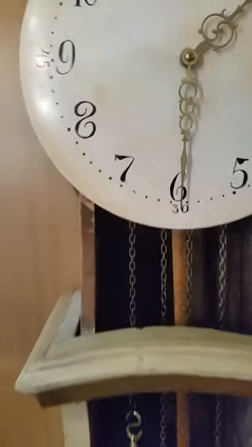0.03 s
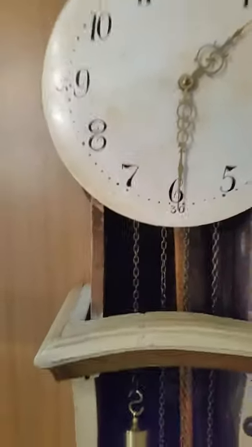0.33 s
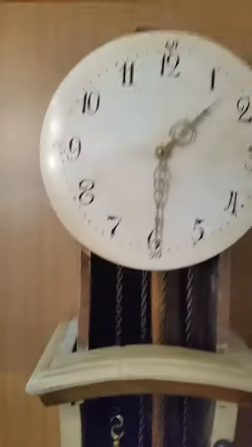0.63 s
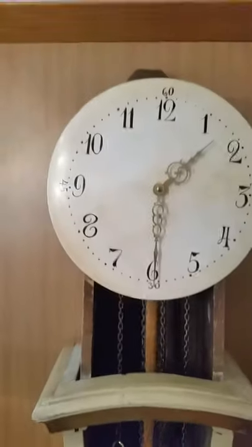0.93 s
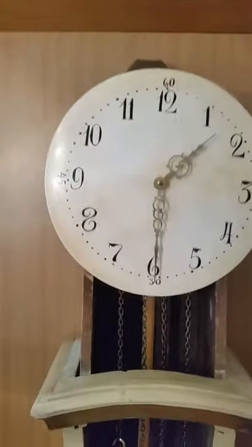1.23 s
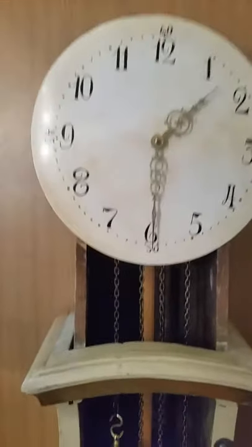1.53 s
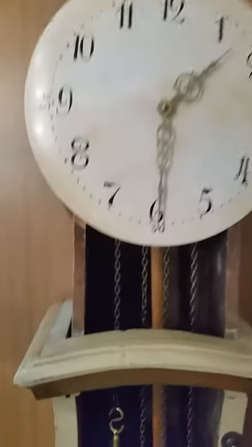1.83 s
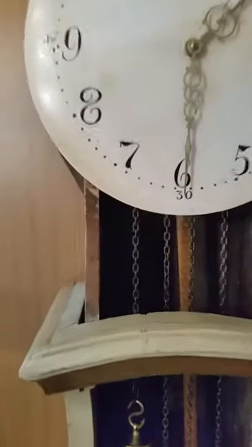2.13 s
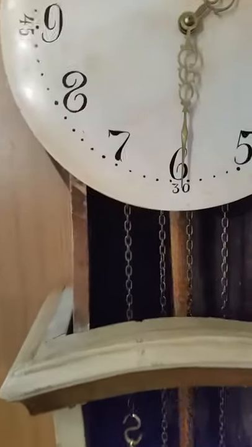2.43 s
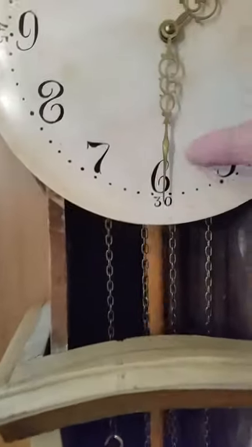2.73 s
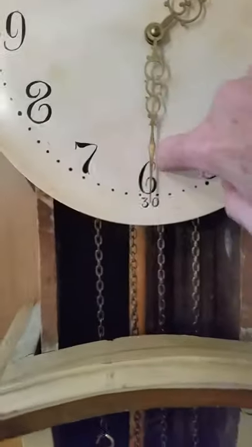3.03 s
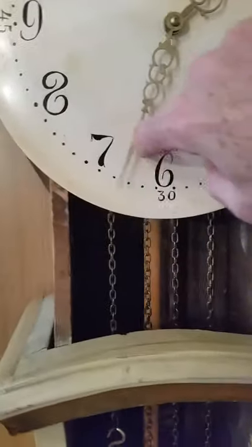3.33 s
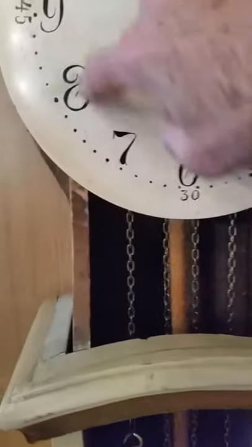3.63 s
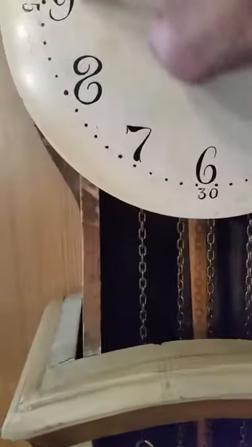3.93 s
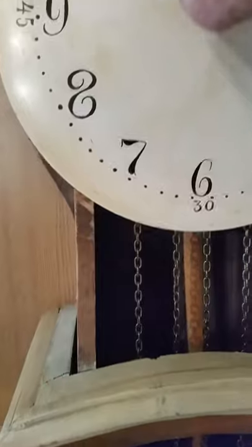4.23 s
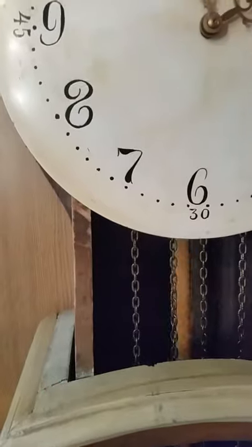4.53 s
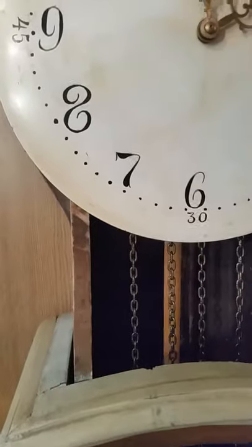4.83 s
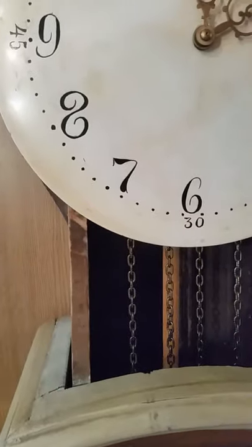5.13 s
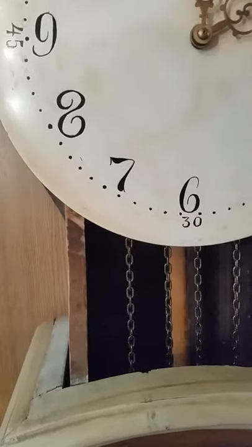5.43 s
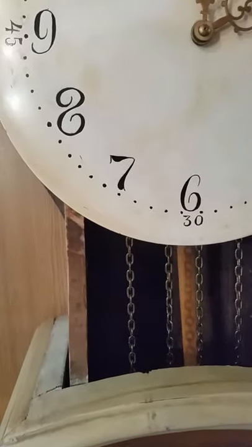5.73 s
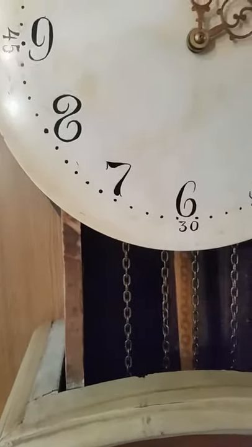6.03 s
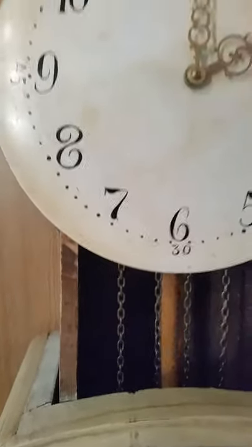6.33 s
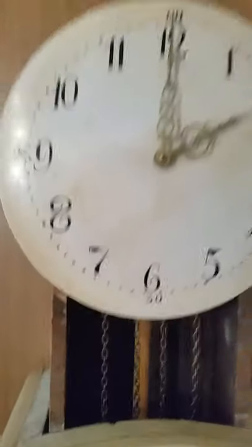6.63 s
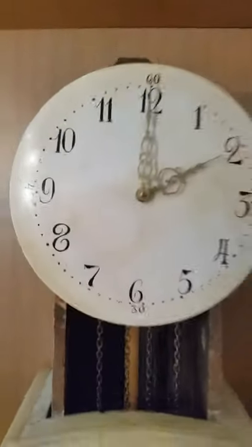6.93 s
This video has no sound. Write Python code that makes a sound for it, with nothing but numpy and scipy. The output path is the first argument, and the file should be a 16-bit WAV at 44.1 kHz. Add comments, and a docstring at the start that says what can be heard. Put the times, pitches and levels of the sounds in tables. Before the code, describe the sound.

A wall clock ticks faintly and evenly, about every 0.6 seconds, in a quiet room with soft hiss and the constant low rumble of a hand-held microphone. At 0.3 seconds a lever clicks and a small bell buzzes brightly against its hammer, choked after about half a second. At 1.1 seconds a larger bell is struck once, with a click and a soft knock from the wooden case. A quick run of dull handling bumps follows at 1.2 seconds. The bell's high, clear ring holds for about a second and then falls away, leaving a faint, gently wavering tone that lingers to the end. Light microphone bumps come here and there, one near 4 seconds. The case knocks softly at 5 seconds, and again with a lever click at 5.5. At about 6.9 seconds another click starts the small bell buzzing again, slightly duller, right at the end.

```python
"""A low rumble and a soft hiss fill a quiet room, where a wall clock ticks as a finger turns its minute hand.
A small bell buzzes against its hammer and is choked; a larger bell, struck once, rings on in its
slowly damped modes; then the small one starts again. Levers click and the wooden case knocks.
The hand-held microphone rumbles and bumps, and drifts through the standing waves of the long partials."""
import sys
import numpy as np
from scipy import signal
from scipy.fft import rfft, irfft, next_fast_len
from scipy.io import wavfile
from scipy.ndimage import map_coordinates

SR = 44100
rng = np.random.default_rng(int(sys.argv[2]) if len(sys.argv) > 2 else 0)


def to_wav(sig):
    """Store sig (one row per channel, or 1-D mono) as 16-bit WAV at the path in sys.argv[1].

    Samples outside -1..1 are clipped; the rate is SR.
    """
    pcm = np.clip(np.atleast_2d(sig), -1, 1) * 32767
    pcm = np.round(pcm).astype(np.int16)
    wavfile.write(sys.argv[1], SR, pcm.T)  # frames by channels


N = 308700
TIME = np.arange(N) / SR

# Spectra give shape only. A balance is left minus right; a lead is the left port's phase advance.
# rumble of the hand, room hiss and its bright top: frequency_hz, level_db
RUMBLE_SPECTRUM = [(15, -7), (30, 5.5), (55, 2), (105, -2.5), (160, -12), (220, -16.5), (310, -27),
                   (420, -34), (800, -49), (2000, -84.5)]
HISS_SPECTRUM = [(300, 0), (700, -2), (1100, -4), (1550, -6.5), (1950, -16.5), (2500, -9), (2950, -18.5),
                 (3350, -14), (3900, -3.5), (4500, -3), (5000, -12.5), (5800, -34.5), (8000, -44.5),
                 (10000, -32)]
AIR_SPECTRUM = [(8000, -62.5), (10000, -23.5), (12000, -11.5), (13700, -1.5), (15700, -4.5)]
# their lean between the microphone ports: frequency_hz, balance_db
RUMBLE_LEAN = [(30, 1.5), (70, 6), (160, 15.5), (350, 7.5)]
HISS_LEAN = [(400, 3.5), (1300, 6), (1950, 4), (2500, 7.5), (2950, 0), (4200, 17.5), (6000, -3.5),
             (14000, 4.5)]
# rumble, stronger while the hand moves: time_s, relative_db
RUMBLE_CONTOUR = [(0.0, -38.5), (0.41, -36.5), (0.66, -35), (0.99, -40), (2.05, -36), (3.92, -41),
                  (4.31, -41), (4.54, -41), (5.87, -42.5), (6.1, -38), (7.0, -38)]

# tock and tick: treble_db, case_db
TOCK_TICK = [(-66, -55), (-51, -52)]
# a click and the wooden case's response: frequency_hz, level_db
CLICK_SPECTRUM = [(1000, -15), (2900, -14), (4200, -3.5), (5500, -34), (8000, -38), (10000, -20),
                  (14000, 2), (15800, 5)]
CASE_SPECTRUM = [(150, -8.5), (500, 11), (1300, -5), (1900, -11.5), (2500, -13), (3200, -13), (6000, -54.5)]

# bumps of the hand on the microphone: start_s, relative_db, pitch_hz
HAND_BUMPS = [(.259, -18, 83), (1.228, -9, 96), (2.885, -22.5, 88.5), (4.065, -18.5, 98.5),
              (4.745, -27, 74), (5.224, -26.5, 221), (5.256, -19.5, 129), (5.579, -26.5, 98),
              (6.795, -22, 82.5)]
# skin rubbing the housing: frequency_hz, level_db
SKIN_SPECTRUM = [(60, -7.5), (230, 4.5), (330, -6), (450, -20.5), (700, -40.5), (2000, -74)]

# blows on the small bell: start_s, gain_db, tilt_db_per_octave, buzz_db, extra_rise_s
SMALL_BLOWS = [(.321, 0, 0, -36.5, 0), (6.867, 1.5, -4.5, -38, 0.019)]
# its modes: pitch_hz, level_db, rise_s, hold_s, t60_s, balance_db, roughness_ratio, beat_hz
SMALL_MODES = [(461, -64, .02, .25, .8, 10, .8, 20), (1140, -64, .02, .22, .9, 12, .8, 25),
               (1753, -60.5, .025, .22, .75, 5, .3, 13), (4141, -46, .001, .21, .45, -1, .2, 7),
               (4076, -57, .15, .45, 1.5, 8, .15, 2), (6989, -51.5, .08, .2, .45, -3, .25, 4),
               (7159, -62, .02, .38, .8, -3, .4, 3), (10545, -43.5, .04, .17, .42, 21, .15, 6),
               (10593, -50, .07, .22, .6, 14, .25, 3), (14672, -32.5, .001, .12, .7, 21, .55, 22),
               (14698, -44, .002, .31, .75, 21, .3, 48), (15680, -49, .002, .13, .85, 21, .9, 27),
               (12640, -58, .003, .18, .9, 17, 1, 30)]
# its hammer's buzz: frequency_hz, level_db
BUZZ_SPECTRUM = [(300, -12), (2900, -37), (4200, -7.5), (5500, -60), (9500, -98), (10400, -12),
                 (11400, -27.5), (12500, -9), (13300, -27), (14000, -14.5), (14600, 5), (15100, -19.5),
                 (15700, 2.5)]

# impacts of hammers and levers: start_s, treble_db, t60_s, case_db
LEVER_CLICKS = [(.321, -40, 0.033, -56), (0.368, -51, 0.019, -66), (1.065, -39.5, 0.17, -64),
                (5.521, -54, .12, -53.5), (6.869, -36, .02, -59)]
# soft knocks of the works and case: start_s, level_db, pitch_hz, width_hz, t60_s
WOOD_KNOCKS = [(1.03, -55, 583, 90.5, 0.57), (5.014, -50, 1400, 300, 0.064), (5.02, -53.5, 650, 150, 0.16),
               (5.513, -56, 1220, 500, 0.25)]

# the blow on the large bell: start_s, gain_db
LARGE_BLOW = (1.066, 0)
# its upper modes: pitch_hz, level_db, rise_s, hold_s, t60_s, balance_db, roughness_ratio, beat_hz
UPPER_MODES = [(6412, -58.5, .003, .14, 2.5, -5, .15, 8), (9545, -58, .004, .2, .8, 5, .05, 3),
               (9611, -48.5, .004, .12, .8, 9, .05, 1.5), (13139, -39, .004, .055, .36, 23, .06, 3),
               (15660, -48, .001, .025, .35, 22, .35, 35)]
# the microphone's path through the hum tone's standing wave: time_s, gain_db, balance_db, lead_rad
MICROPHONE_DRIFT = [(1.2, -0.5, -5, -0.5), (1.72, -1, -2, -2.5), (2.35, 5.5, 6, -2), (3.0, 1, 11.5, -.8),
                    (3.7, 1.5, 19.5, 0), (4.5, 4.5, 18.5, -2), (6.2, -1.5, 13.5, -2), (6.8, -11.5, 5, -0.5)]
# the large bell's two main modes: lower_hz, upper_hz
PAIR_PITCHES = (3664.8, 3720.6)
# how each rings: level_db, rise_s, hold_s, t60_s, lead_rad
PAIR_MODES = [(-42, 0.0015, 0.69, 3, -0.54), (-48, 0.36, 0.82, 2.32, -0.67)]


def amp(db):
    """Amplitude grows tenfold for every 20 dB."""
    return 10 ** (np.asarray(db) / 20)


def unit(x):
    """Normalisation to rms 1."""
    return x / np.sqrt(np.mean(np.abs(x) ** 2) + 1e-20)


def along(points, hz):
    """Interpolation on a logarithmic frequency axis."""
    frequencies, values = np.transpose(points)
    return np.interp(np.log(hz + 1), np.log(frequencies + 1), values)


def curves(rows):
    """Linear interpolation in time, one curve for each column after the first."""
    times, *columns = np.transpose(rows)
    return [np.interp(TIME, times, column) for column in columns]


def sides(balance_db):
    """A level difference, shared between left and right gains."""
    return amp(np.array([[.5], [-.5]]) * balance_db)


def wobble(rate_hz):
    """Smooth random modulation: a spline through Gaussian values."""
    return map_coordinates(rng.standard_normal(int(N * rate_hz / SR) + 4), [TIME * rate_hz])


def filtered(x, response):
    """Linear filtering multiplies the spectrum by a frequency response."""
    n = x.shape[-1]
    padded = next_fast_len(n + SR // 4)
    return irfft(rfft(x, padded) * response(np.fft.rfftfreq(padded, 1 / SR)), padded)[..., :n]


def noise(spectrum, size):
    """Spectral shaping of white noise, in stereo at rms 1."""
    return unit(filtered(rng.standard_normal((2, size)), lambda hz: amp(along(spectrum, hz))))


def add(track, start_s, sound):
    """Superposition: a sound sums into the track from its start time."""
    rest = track[:, round(start_s * SR):]
    rest[:, :sound.shape[-1]] += sound[:, :rest.shape[-1]]


def swell(t, rise, hold, t60):
    """Exponential build-up, then damping of 60 dB per t60 after the hold; times in seconds."""
    return (1 - np.exp(-t / rise)) * amp(-60 * np.maximum(t - hold, 0) / t60)


def leaning_noise(spectrum, lean):
    """Noise whose level difference between the ports depends on frequency."""
    return unit(filtered(noise(spectrum, N), lambda hz: sides(along(lean, hz))))


def hand_rumble(gain_db=5):
    """Structure-borne sound: the hand shakes the microphone unevenly at low frequencies."""
    contour_db, = curves(RUMBLE_CONTOUR)
    rumble = leaning_noise(RUMBLE_SPECTRUM, RUMBLE_LEAN)
    return rumble * amp(contour_db + gain_db + 0.59 * wobble(15) + 2.4 * wobble(45))


def room_hiss(hiss_db=-57, air_db=-68):
    """Stationary noise of the room air, coloured by the microphone ports."""
    hiss = amp(hiss_db) * leaning_noise(HISS_SPECTRUM, HISS_LEAN)
    return hiss + amp(air_db) * sides(8.9) * noise(AIR_SPECTRUM, N)


def burst(spectrum, t, t60):
    """An impact's response, modelled as exponentially damped noise through a filter."""
    puff = rng.standard_normal((2, len(t))) * amp(-60 * t / t60)
    return filtered(puff, lambda hz: unit(amp(along(spectrum, hz))))


def impacts(clicks, case_t60_s=0.064):
    """Impulsive excitation: each contact gives a bright click and sets the wooden case sounding."""
    out, t = np.zeros((2, N)), np.arange(SR // 2) / SR
    for start_s, treble_db, t60_s, case_db in clicks:
        add(out, start_s, amp(treble_db) * sides(11) * burst(CLICK_SPECTRUM, t, t60_s))
        add(out, start_s, amp(case_db) * sides(13) * burst(CASE_SPECTRUM, t, case_t60_s))
    return out


def escapement(first_s=.072, swing_s=.6392, t60_s=.024):
    """Isochronism: the pendulum's equal swings space tock and tick evenly."""
    times = np.arange(first_s, N / SR, swing_s)
    return impacts([(start_s, treble_db, t60_s, case_db)
                    for k, (treble_db, case_db) in enumerate(TOCK_TICK) for start_s in times[k::2]])


def hand_bumps(bumps, gain_db=-7, rub_db=-19, cycles_to_peak=0.9):
    """Heavy damping: each bump is a dull push of a cycle or two, with brief friction of skin."""
    out, t = np.zeros((2, N)), np.arange(SR // 8) / SR
    for start_s, relative_db, hz in bumps:
        age = t * hz / cycles_to_peak
        push = (age * np.exp(1 - age)) ** 4 * np.cos(2 * np.pi * hz * t)
        rub = amp(rub_db) * noise(SKIN_SPECTRUM, len(t)) * swell(t, rise=0.001, hold=0.012, t60=0.053)
        add(out, start_s, amp(relative_db + gain_db) * sides(17.8) * (push + rub))
    return out


def ring(modes, t, width_hz, twin_db, port_lag_s=.00003):
    """Beating: each mode interferes with a weaker twin; chatter spreads part of it into a noise band."""
    out, pole = np.zeros((2, len(t))), np.exp(-np.pi * width_hz / SR)
    for hz, level_db, rise, hold, t60, balance_db, roughness, beat_hz in modes:
        kicks = rng.standard_normal((2, len(t))) + 1j * rng.standard_normal((2, len(t)))
        chatter = unit(signal.lfilter([1], [1, -2 * pole, pole ** 2], kicks))
        doublet = unit(1 + amp(twin_db) * np.exp(2j * np.pi * beat_hz * t))
        carrier = np.exp(2j * np.pi * hz * np.array([t, t - port_lag_s]))
        tone = np.imag((np.sqrt(1 - roughness ** 2) * doublet + roughness * chatter) * carrier)
        out += amp(level_db) * sides(balance_db) * swell(t, rise, hold, t60) * tone
    return out


def small_bell(choke_after_s=0.505, choke_t60_s=0.36, choke_above_hz=5800, pivot_hz=4100, body_hz=1400):
    """Contact damping: the hammer buzzes on the rim, then settles and chokes the bright partials."""
    out, t = np.zeros((2, N)), np.arange(SR) / SR
    choke = amp(-60 * np.maximum(t - choke_after_s, 0) / choke_t60_s)
    for start_s, gain_db, tilt, buzz_db, extra_rise_s in SMALL_BLOWS:
        contact = amp(3.5 * wobble(70)[:SR])  # the contact comes and goes
        buzz = amp(buzz_db) * sides(13) * noise(BUZZ_SPECTRUM, SR)
        buzz *= swell(t, rise=0.018, hold=0.19, t60=1.0)
        # a softer blow builds up more slowly and is duller; the tilt spares the low rattle
        modes = [(hz, db + gain_db + tilt * np.log2(hz / pivot_hz) * (hz > body_hz),
                  rise + extra_rise_s, *rest) for hz, db, rise, *rest in SMALL_MODES]
        sound = ring(modes, t, width_hz=110, twin_db=-6.5) + contact * buzz
        low = filtered(sound, lambda hz: 1 / (1 + (hz / choke_above_hz) ** 24))
        add(out, start_s, low + choke * (sound - low))
    return out


def case_knocks():
    """Damped resonance: the wood answers each knock with one broad, dying band of noise."""
    out, t = np.zeros((2, N)), np.arange(SR // 2) / SR
    for start_s, level_db, pitch_hz, width_hz, t60_s in WOOD_KNOCKS:
        white = rng.standard_normal((2, len(t)))
        wood = unit(filtered(white, lambda hz: 1 / (1 + (2 * (hz - pitch_hz) / width_hz) ** 2)))
        add(out, start_s, amp(level_db) * sides(12) * swell(t, rise=0.003, hold=0, t60=t60_s) * wood)
    return out


def large_bell():
    """Free vibration after one blow: the upper modes die quickly, the hum tone and main pair ring on."""
    out = np.zeros((2, N))
    start_s, gain_db = LARGE_BLOW
    add(out, start_s, ring(UPPER_MODES, np.arange(2 * SR) / SR, width_hz=160, twin_db=-8))
    t = np.maximum(TIME - start_s, 0)
    return amp(gain_db) * (out + hum_tone(t) + main_pair(t))


def partial(hz, t, lead_rad):
    """Simple harmonic motion at rms 1, with a phase difference between the ports."""
    return np.sqrt(2) * np.sin(2 * np.pi * hz * t + np.array([[.5], [-.5]]) * lead_rad)


def hum_tone(t, pitch_hz=1508.5, beat_hz=7.7, level_db=-56, twin_db=-19):
    """Standing wave: the lowest mode beats gently while the right port drifts into a node."""
    gain_db, balance_db, lead_rad = curves(MICROPHONE_DRIFT)
    ports = sides(balance_db)
    ports /= np.sqrt(np.mean(ports ** 2, axis=0))  # equal power at any balance
    doublet = partial(pitch_hz, t, lead_rad) + amp(twin_db) * partial(pitch_hz - beat_hz, t, lead_rad)
    return amp(level_db + gain_db) * ports * doublet * swell(t, rise=0.032, hold=0, t60=26)


def main_pair(t, aftersound_db=-15.5, sway_hz=1.3, sway_db=1.5):
    """Two-stage decay: two close modes hold, fall quickly and leave a faint aftersound."""
    out = np.zeros((2, N))
    for hz, (level_db, rise, hold, t60, lead_rad) in zip(PAIR_PITCHES, PAIR_MODES):
        aftersound = amp(aftersound_db) * swell(t, rise, hold=0, t60=9.9)
        envelope = np.hypot(swell(t, rise, hold, t60), aftersound)
        out += amp(level_db) * envelope * partial(hz, t, lead_rad)
    # the pair swells at one moving port as it sinks at the other
    return out * sides(2 * sway_db * np.cos(2 * np.pi * sway_hz * t))


def grip_slip(start_s=1.2, step_s=.0215, scatter_s=.002, relative_db=-17, pitch_hz=107, count=7):
    """Stick-slip friction: the grip gives way in a quick run of nearly even bumps."""
    return hand_bumps([(start_s + k * step_s + scatter_s * late,
                        relative_db + size, pitch_hz * np.exp(0.16 * high))
                       for k, (late, size, high) in enumerate(rng.standard_normal((count, 3)))])


def scene():
    """Superposition: the pressures of clock, hand and room add."""
    clock = small_bell() + large_bell() + impacts(LEVER_CLICKS) + escapement() + case_knocks()
    return clock + hand_bumps(HAND_BUMPS) + grip_slip() + hand_rumble() + room_hiss()


def record(dry, top_hz=15900):
    """Band limiting: a steep low-pass filter removes the highest treble."""
    return filtered(dry, lambda hz: 1 / (1 + (hz / top_hz) ** 240))


dry = scene()
out = record(dry)
to_wav(out)
```